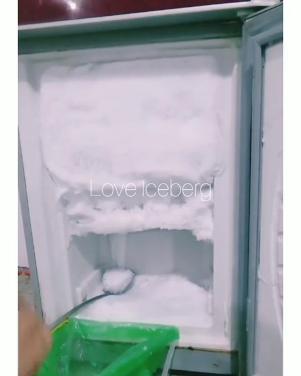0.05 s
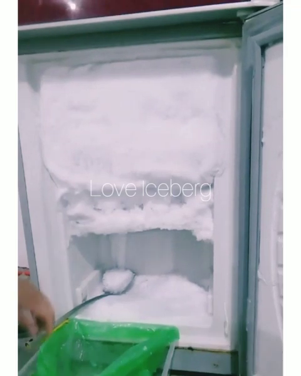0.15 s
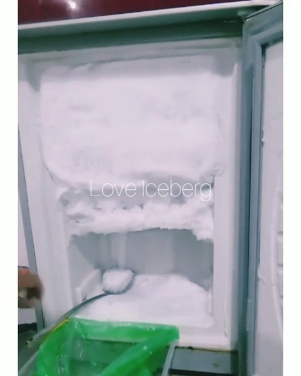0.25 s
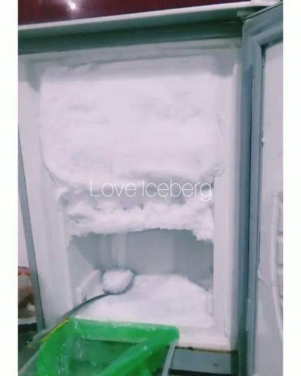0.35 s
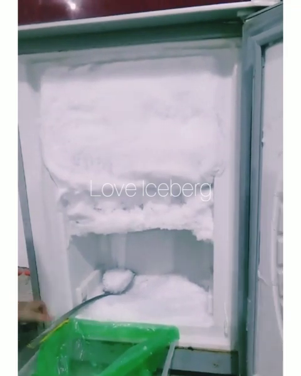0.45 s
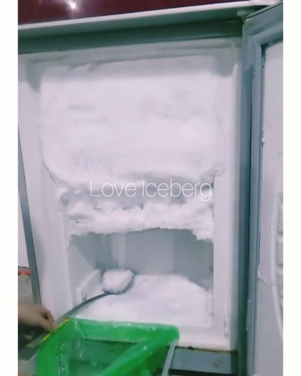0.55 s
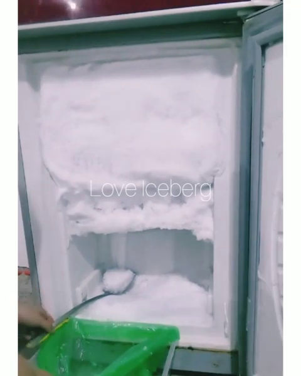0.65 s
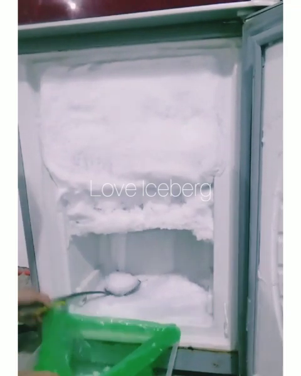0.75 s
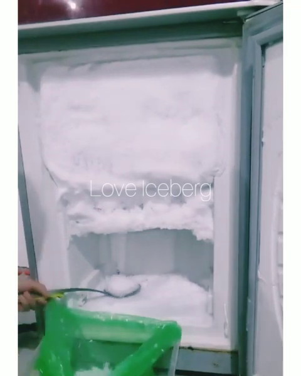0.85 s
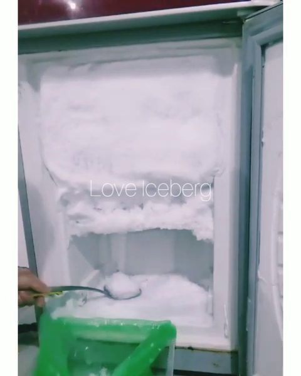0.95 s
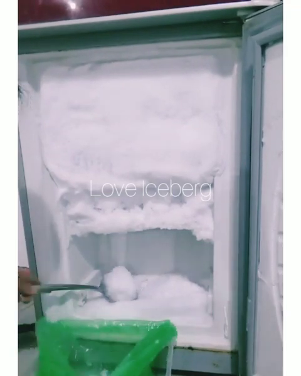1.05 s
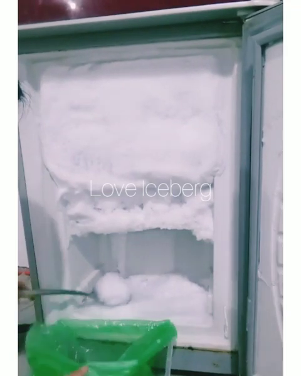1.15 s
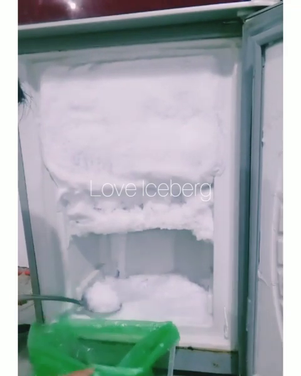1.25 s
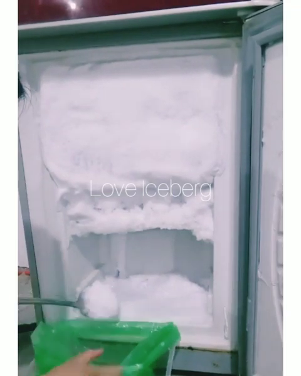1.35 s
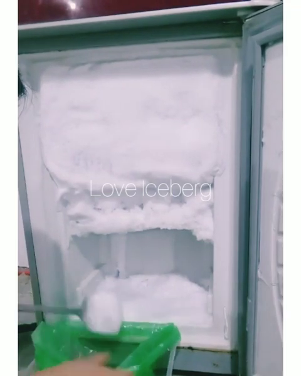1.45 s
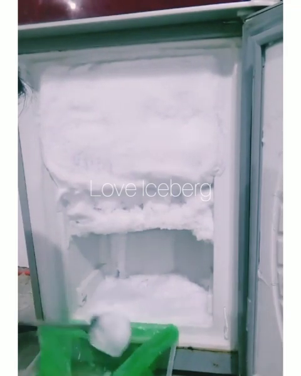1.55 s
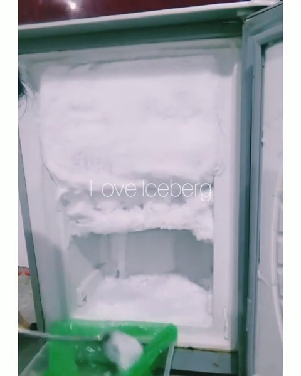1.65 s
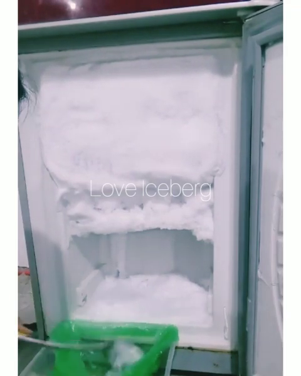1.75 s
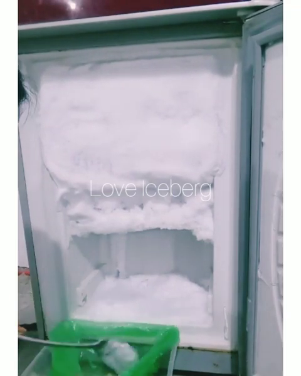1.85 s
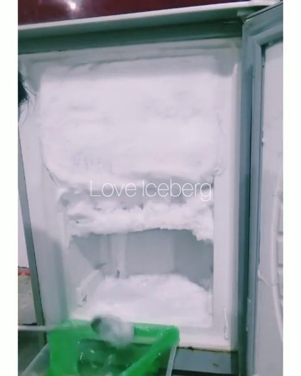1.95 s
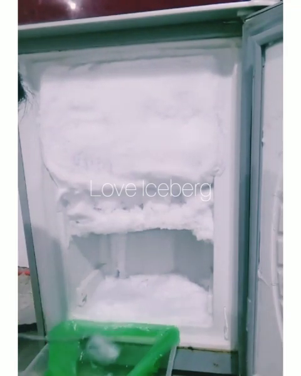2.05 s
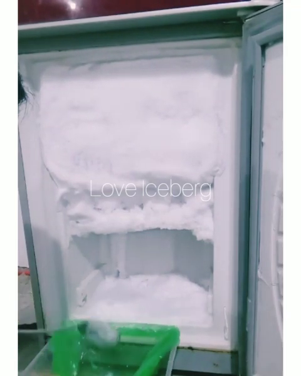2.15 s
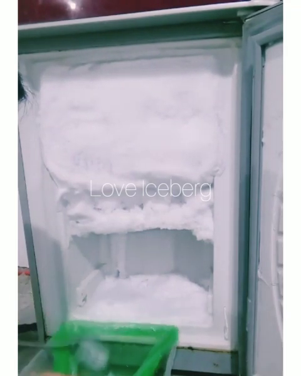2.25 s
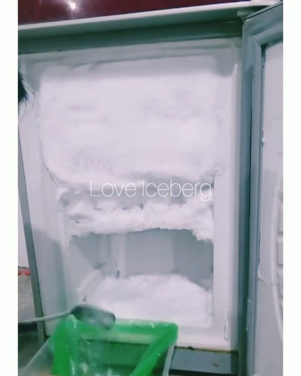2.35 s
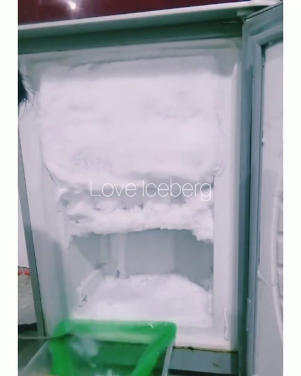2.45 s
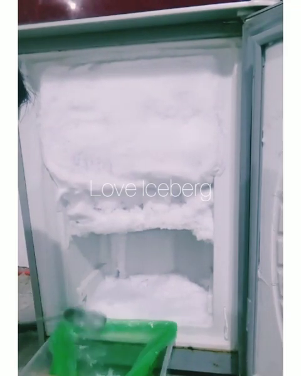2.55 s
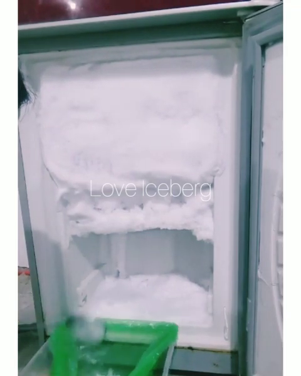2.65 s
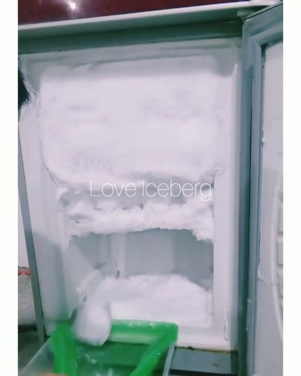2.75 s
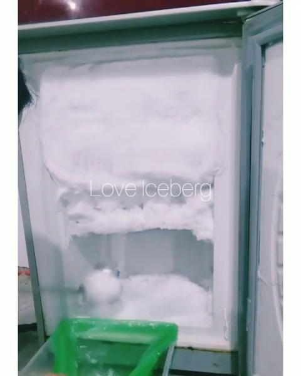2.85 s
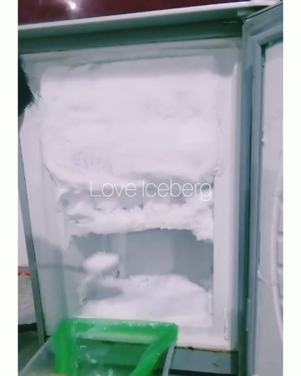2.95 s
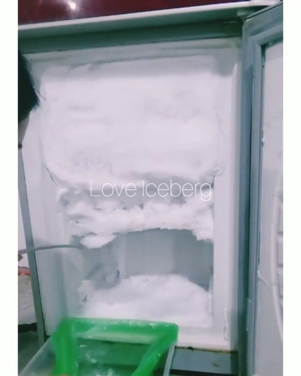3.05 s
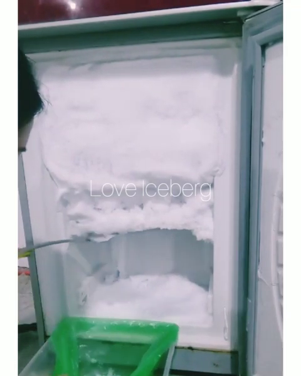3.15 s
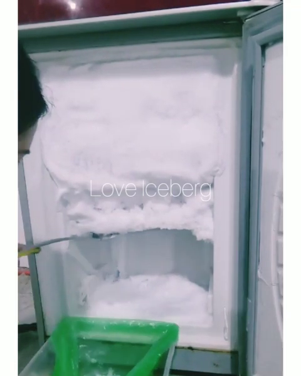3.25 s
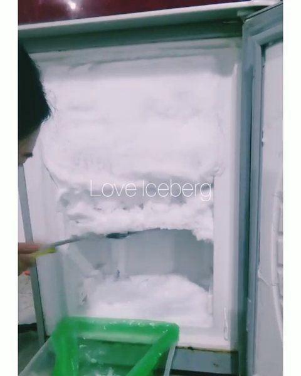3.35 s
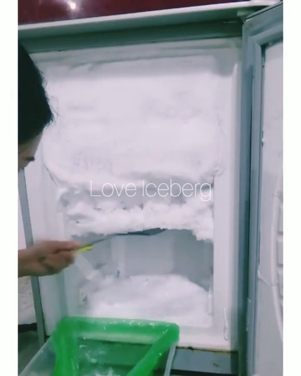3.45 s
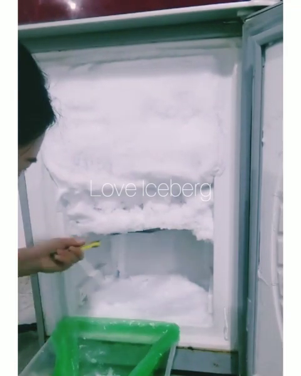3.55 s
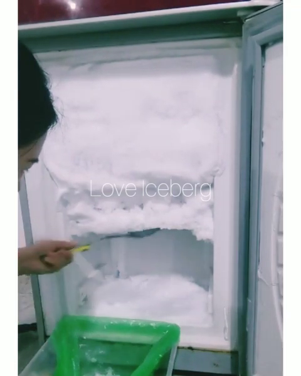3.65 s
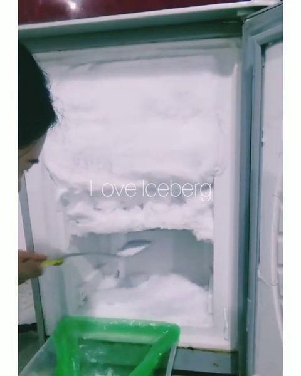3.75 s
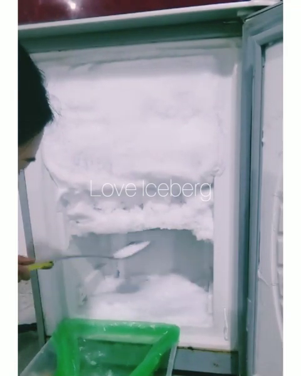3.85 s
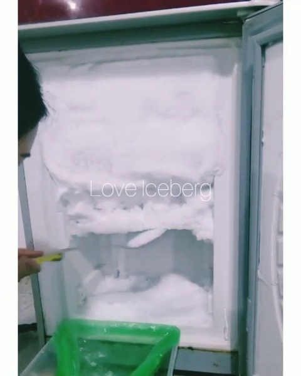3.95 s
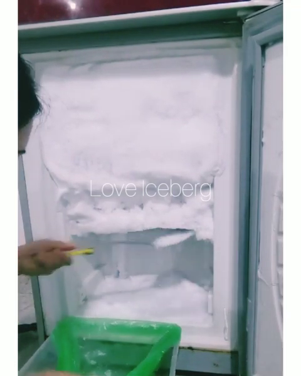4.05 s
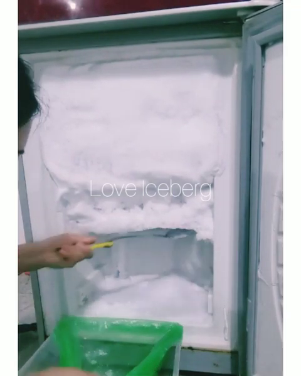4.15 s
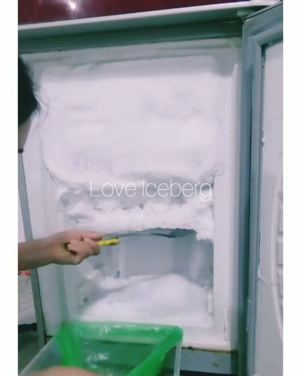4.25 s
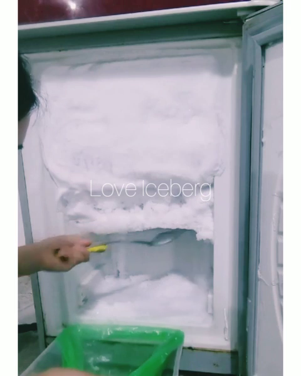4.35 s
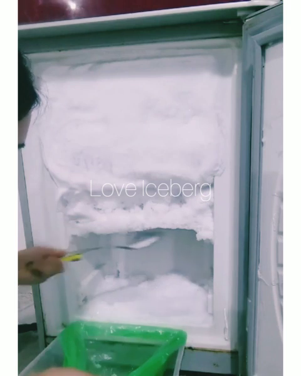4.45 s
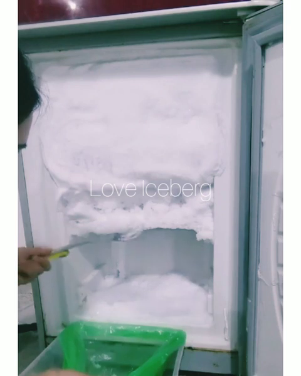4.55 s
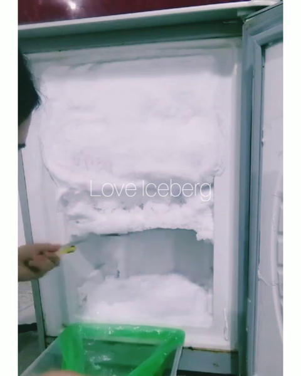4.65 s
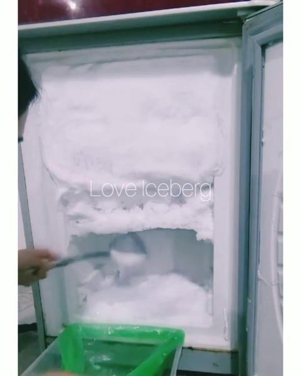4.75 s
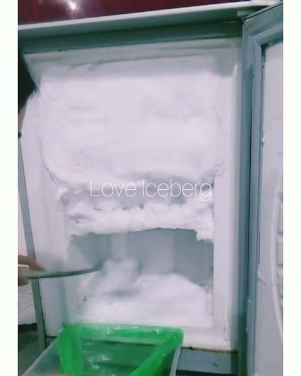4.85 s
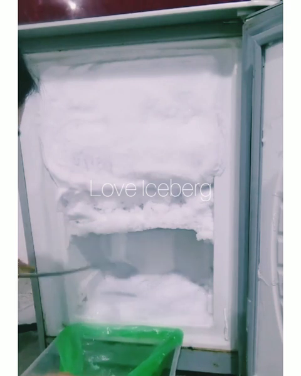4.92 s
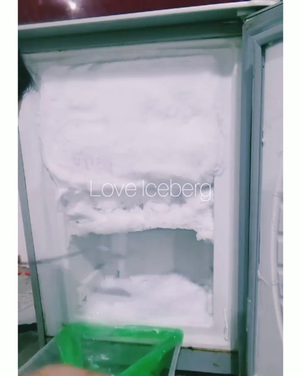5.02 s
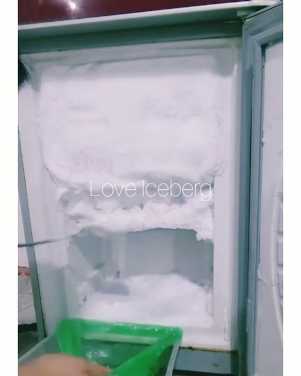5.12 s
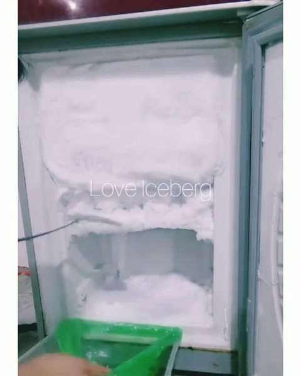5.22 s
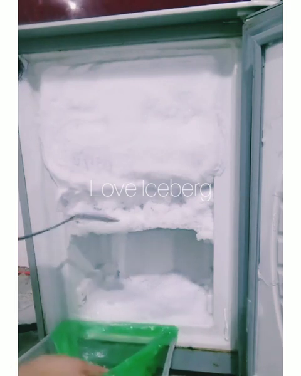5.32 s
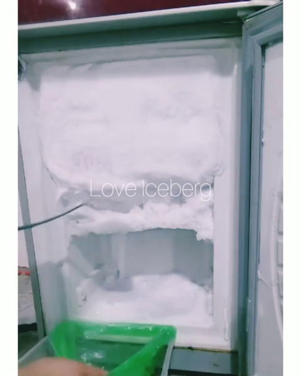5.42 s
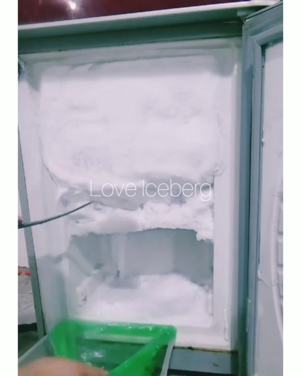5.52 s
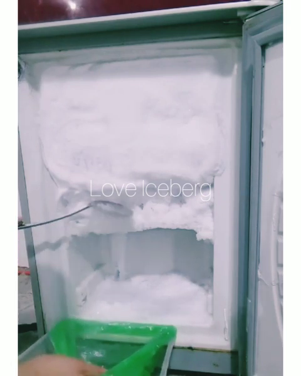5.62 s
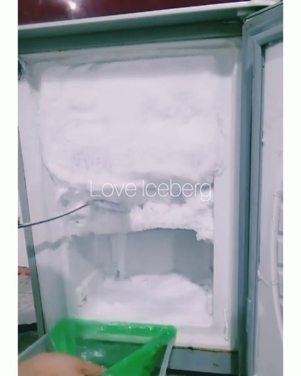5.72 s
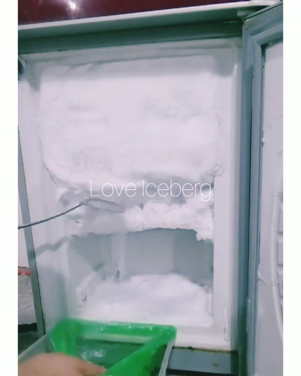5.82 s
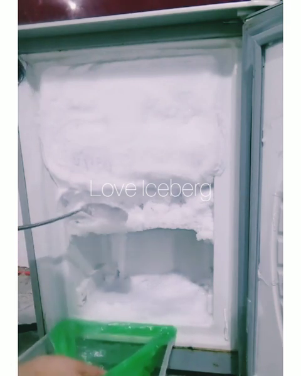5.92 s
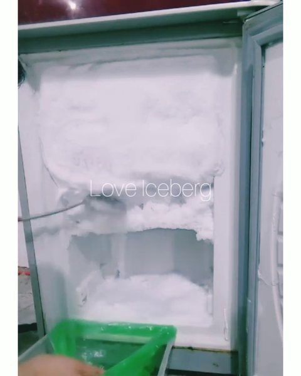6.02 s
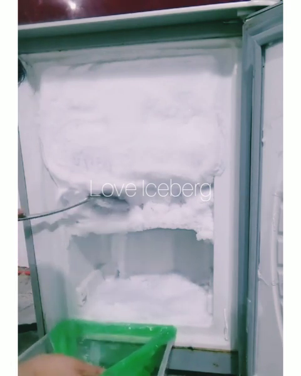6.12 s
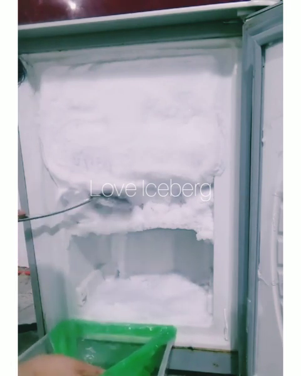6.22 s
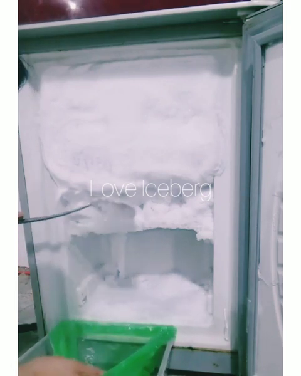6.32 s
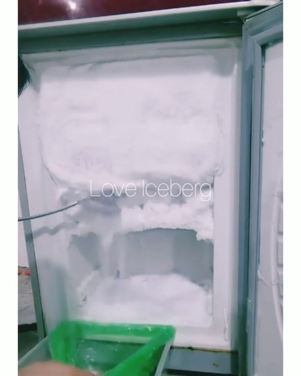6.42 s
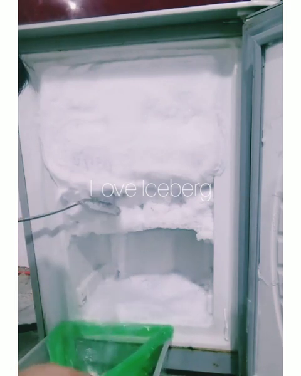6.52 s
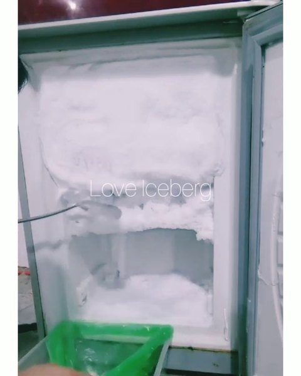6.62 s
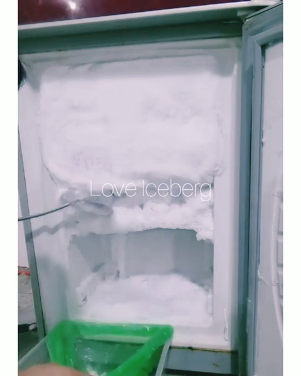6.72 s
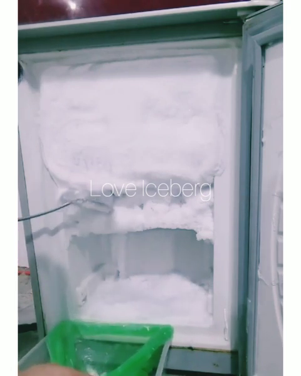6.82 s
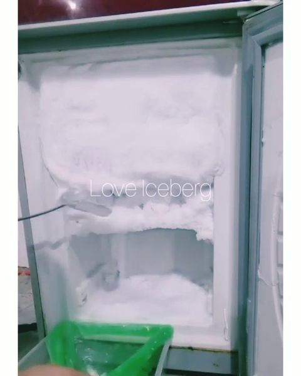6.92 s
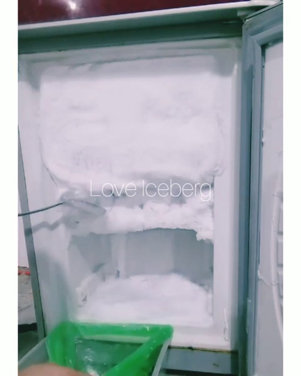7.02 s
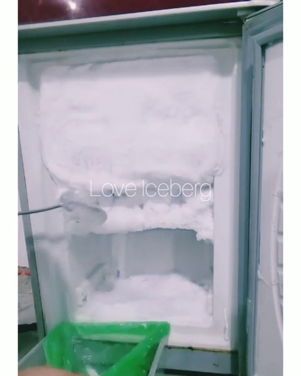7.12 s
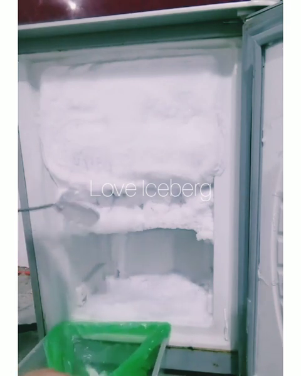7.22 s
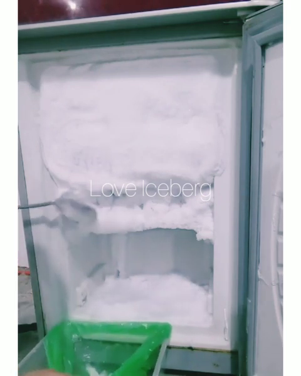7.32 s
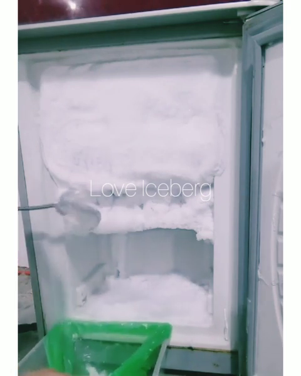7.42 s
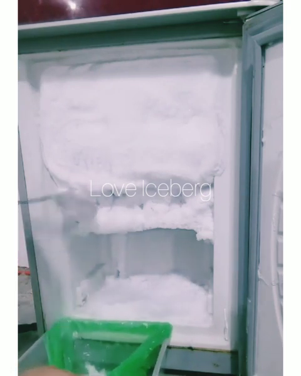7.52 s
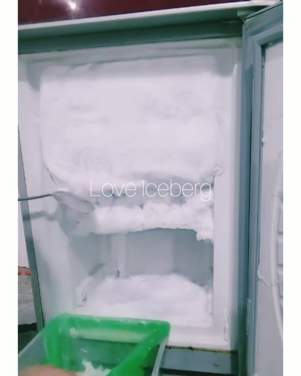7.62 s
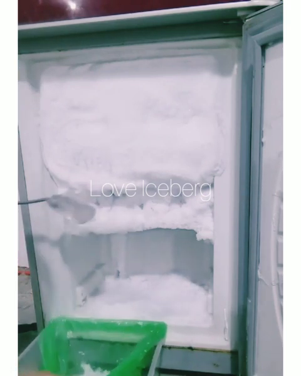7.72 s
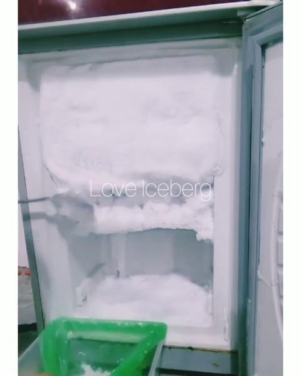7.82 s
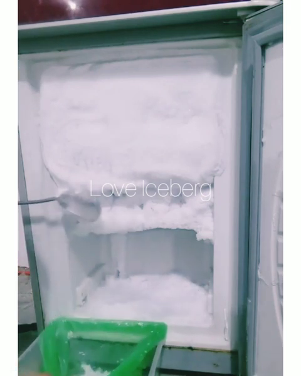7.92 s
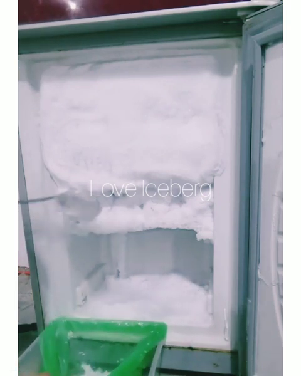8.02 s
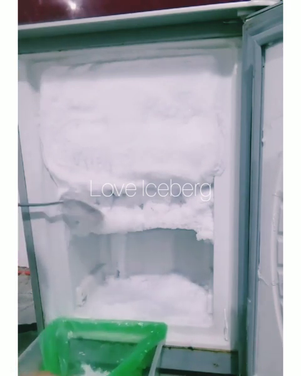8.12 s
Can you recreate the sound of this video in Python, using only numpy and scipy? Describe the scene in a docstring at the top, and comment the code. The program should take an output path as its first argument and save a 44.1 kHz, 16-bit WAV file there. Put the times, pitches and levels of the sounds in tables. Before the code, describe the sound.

In a small kitchen, a metal spoon scoops crunchy frost from a freezer, with soft hissing drags and dull knocks, then rubs against a lined bin. It rakes the compartment roof with hollow, ringing scrapes, pauses briefly, and finally chops the icy shelf in bright, regular jabs running into gritty scrapes. Close mono microphone, short dry room, faint steady hush.

```python
"""In a kitchen freezer a steel spoon works at the frost: scoops loose snow, scrapes it off in a lined bin,
rakes the roof of the compartment, then chops at the icy shelf in jabs that run on as scrapes.
Scrapes are clumped random fractures, filtered into surface thrum, edge rasp and crystal hiss with spoon ring.
Jabs are short noise bursts with ring and a delayed cabinet thud; bumps are cabinet modes under a short push.
A short room tail and a steady noise hush lie beneath; a fast limiter holds the peaks, both channels alike."""
import sys
import numpy as np
from scipy import signal
from scipy.fft import rfft, irfft, next_fast_len
from scipy.io import wavfile
from scipy.ndimage import uniform_filter1d, minimum_filter1d, map_coordinates

SR = 44100
rng = np.random.default_rng(int(sys.argv[2]) if len(sys.argv) > 2 else 0)


def dump(signal):
    """Clip the signal to [-1, 1] and save it as 16-bit WAV at the path in sys.argv[1]."""
    limited = np.clip(np.atleast_2d(signal).T, -1, 1)
    pcm = np.round(limited * 32767).astype(np.int16)
    wavfile.write(sys.argv[1], SR, pcm)


N = 360738  # samples
THRUM_TOP_HZ, RASP_TOP_HZ, TOP_HZ = 800, 3500, 16000


def amp(db):
    """Decibels to gain."""
    return 10 ** (np.asarray(db) / 20)


def unit(x):
    """Scale to rms 1."""
    return x / np.sqrt(np.mean(x ** 2) + 1e-20)


def along(points, hz):
    """Read (Hz, value) points on a log frequency axis."""
    f, v = np.transpose(points)
    return np.interp(np.log(hz + 1), np.log(f + 1), v)


def wobble(size, rate):
    """Smooth random curve, rate knots per second."""
    knots = rng.standard_normal(int(size * rate / SR) + 4)
    return map_coordinates(knots, [np.arange(size) * rate / SR])


def filtered(x, response):
    """Multiply the spectrum of x by response(hz)."""
    m = next_fast_len(len(x) + SR // 4)
    hz = np.fft.rfftfreq(m, 1 / SR)
    return irfft(rfft(x, m) * response(hz), m)[:len(x)]


def shaped_noise(size, gain_db):
    """White noise coloured by gain_db(hz), rms 1."""
    return unit(filtered(rng.standard_normal(size), lambda hz: amp(gain_db(hz))))


def below(hz, edge_hz, order=12):
    """Gain of a steep low-pass."""
    return 1 / np.sqrt(1 + (hz / edge_hz) ** order)


def above(hz, edge_hz):
    """Gain of the power-complementary high-pass."""
    return np.sqrt(1 - below(hz, edge_hz) ** 2)


def resonances(modes, hz):
    """Causal response of damped modes (Hz, width Hz, dB), alternating in sign."""
    total = 0
    for k, (centre, width, db) in enumerate(modes):
        mode = 1j * hz * width / (centre * centre - hz * hz + 1j * hz * width)
        total = total + (-1) ** k * amp(db) * mode
    return total


def add(track, s, sound):
    """Mix a sound into track at s seconds."""
    part = track[max(round(s * SR), 0):][:len(sound)]
    part += sound[:len(part)]


# hush spectrum: f/Hz, relative density/dB
HUSH_SPECTRUM = [(15, -64), (25, -31.5), (105, -4), (206, -3.5), (641, -10.5), (695, -10.5), (936, -15.5),
                 (1070, -9.5), (1160, -13.5), (1790, -15), (5000, -40), (8140, -28.5), (16000, -67)]


def room_tone(level_db):
    """Steady hush of the kitchen: stationary coloured noise."""
    return amp(level_db) * shaped_noise(N, lambda hz: along(HUSH_SPECTRUM, hz))


# room decay: f/Hz, t60/s
ROOM_T60 = [(200, 0.26), (2000, 0.18), (10000, 0.057)]


def kitchen(x):
    """Short room tail: decaying noise, treble dying first, convolved with x."""
    hz, t, z = signal.stft(rng.standard_normal(SR // 2), SR, nperseg=256)
    decay_db = -60 * t / along(ROOM_T60, hz)[:, None]
    tail = signal.istft(z * amp(decay_db), SR, nperseg=256)[1]
    return signal.fftconvolve(x, tail / np.linalg.norm(tail))[:N]


# hollow cabinet modes: f/Hz, width/Hz, relative level/dB
CABINET_MODES = [(88, 9.8, -19), (114, 22, -9.5), (239, 27, -1), (309, 31.5, 4), (450, 110, -14.5),
                 (600, 59, -8)]


def cabinet(hz):
    """Response of the hollow cabinet's low modes."""
    return resonances(CABINET_MODES, hz)


# steel spoon modes: f/Hz, width/Hz, relative level/dB
SPOON_MODES = [(3200, 110, -7), (3860, 60, 1), (5230, 110, -2), (6650, 130, -9), (7200, 300, -5),
               (7680, 200, -4), (10350, 200, -15)]


def spoon_ring(hz):
    """Response of the spoon's ringing modes."""
    return resonances(SPOON_MODES, hz)


def thud(t, push_s):
    """Cabinet modes driven by a short push, peak 1."""
    push = t / push_s * np.exp(-t / push_s)
    boom = filtered(push, cabinet)
    return boom / np.abs(boom).max()


# dull knocks: t/s, relative peak level/dB
KNOCKS = [(0.696, -16), (0.798, -12), (1.682, -9), (3.419, -7.5), (3.588, -12), (4.04, -13), (5.672, -15),
          (5.704, -4.5)]


def bumps(level_db):
    """Back of the spoon knocks the cabinet; a cushion of frost lengthens the push."""
    out, t = np.zeros(N), np.arange(SR // 4) / SR
    for s, db in KNOCKS:
        add(out, s, amp(db + level_db) * thud(t, push_s=0.00085))
    return out


def fractures(size, per_second, scatter_db):
    """Tiny breaks at random moments, random in sign and size, rms 1."""
    happens = rng.random(size) < per_second / SR
    signs = rng.choice([-1, 1], size)
    return unit(happens * signs * amp(scatter_db * rng.standard_normal(size)))


def sliding(x, depth_db, smooth_hz=9000):
    """Travelling contact: narrow resonances come and go, less so in the finest hiss."""
    hz, _, z = signal.stft(x, SR, nperseg=512)
    field = uniform_filter1d(rng.standard_normal(z.shape), size=3, axis=0)  # over frequency
    field = uniform_filter1d(field, size=14, axis=1)  # over time
    depth = depth_db * below(hz, smooth_hz, order=4)[:, None]
    return signal.istft(z * amp(depth * unit(field)), nperseg=512)[1][:len(x)]


# breaking crystals, before tilt: f/Hz, relative density/dB
CRYSTAL_SPECTRUM = [(1470, -34.5), (2500, -25), (3380, -13), (3660, -10.5), (4950, -10.5), (6650, -7),
                    (7950, 1), (9810, -10.5), (13500, -16), (15000, -15), (16000, -15.5)]


def scrape(surface, ring_db, tilt_db, fine_db, uneven_db, size, cabinet_db=-10):
    """Thrum, rasp and crunch of the spoon dragged over one surface, each rms 1."""
    # edge catches and slips: breaks clump
    grip = amp(1.5 * wobble(size, rate=60) + 1.25 * wobble(size, rate=330))
    slips = grip * fractures(size, per_second=4000, scatter_db=3.5)
    breaks = sliding(grip * fractures(size, per_second=7500, scatter_db=1.5), uneven_db)

    def thrum_gain(hz):
        hollow = 1 + amp(cabinet_db) * np.abs(cabinet(hz))
        return amp(along(surface, hz)) * hollow * below(hz, THRUM_TOP_HZ)

    def rasp_gain(hz):
        return amp(along(surface, hz)) * above(hz, THRUM_TOP_HZ) * below(hz, RASP_TOP_HZ)

    def hiss_gain(hz):
        tilt = tilt_db * np.log2((hz + 1) / RASP_TOP_HZ)
        finest = fine_db * above(hz, 9100) ** 2
        return amp(along(CRYSTAL_SPECTRUM, hz) + tilt + finest) * above(hz, RASP_TOP_HZ)

    thrum = filtered(slips, thrum_gain)
    rasp = filtered(breaks, rasp_gain)
    hiss = filtered(breaks, hiss_gain)
    ring = filtered(breaks, spoon_ring)
    # changing pressure bends the modes
    ring = map_coordinates(ring, [np.cumsum(1 + 0.00491 * wobble(size, rate=14))])
    crunch = unit(hiss) + amp(ring_db) * unit(ring)
    return np.array([unit(thrum), unit(rasp), unit(crunch)])


RISE_DB = 15.5  # gained per rise time as the edge digs in
THRUM_RELEASE_DB_PER_S, RASP_RELEASE_DB_PER_S, CRUNCH_RELEASE_DB_PER_S = 63, 72.5, 94.5  # crumbs settle
LIFT_DB, LIFT_S = 4, 0.084  # extra drop as the edge lifts off
# pushes through the frost: t/s of full bite, rise before it/s, push/s,
#   relative thrum, rasp, crunch level/dB, change over push: thrum and rasp/dB, crunch/dB
PUSHES = [(0.027, 0.0073, 0.16, -30, -21, -27.5, -11.5, -15.5),
          (0.694, 0.032, 0.058, -37.5, -46, -37, 4, 6), (0.776, 0.014, 0.064, -20, -19.5, -19.5, 3, 6),
          (0.917, 0.025, 0.097, -27.5, -27.5, -25.5, -1.5, 1.5),
          (1.23, 0.094, 0.32, -45.5, -48.5, -39, -5, -16.5),
          (1.65, 0.032, 0.085, -42.5, -32, -21, 4.5, 2.5),
          (1.755, 0.012, 0.15, -21, -15.5, -13.5, -15.5, -10),
          (2.253, 0.098, 0.077, -43, -35.5, -23.5, -6, -7.5),
          (2.344, 0.0082, 0.12, -19.5, -19, -30.5, 5.5, 4.5),
          (2.536, 0.013, 0.14, -19, -19.5, -26.5, 7, -3), (2.766, 0.017, 0.11, -14, -17.5, -24, 1, -14),
          (3.119, 0.014, 0.062, -23, -30, -30, 0, -22), (3.22, 0.083, 0.15, -32, -31.5, -25.5, 3.5, 6.5),
          (3.401, 0.054, 0.21, -13, -28, -23.5, 2.5, 1), (3.845, 0.2, 0.12, -30.5, -42.5, -59, -2, -3),
          (4.033, 0.0042, 0.077, -9.5, -24, -23.5, -7.5, -4),
          (4.142, 0.059, 0.16, -15.5, -20, -20, -1, 0.5),
          (4.617, 0.012, 0.026, -29, -34.5, -26, -2.5, -2.5),
          (4.746, 0.034, 0.25, -37, -48.5, -51.5, -11, -7),
          (5.029, 0.022, 0.018, -39.5, -30.5, -26.5, -2, 1),
          (5.135, 0.043, 0.034, -44, -37.5, -26, -1, -1.5),
          (5.67, 0.012, 0.14, -12.5, -20.5, -25, -8, -12.5), (5.856, 0.035, 0.1, -26, -30, -25, 0, -3.5),
          (6.109, 0.0066, 0.12, -16, -21, -27, 1, 8.5), (6.515, 0.032, 0.017, -18, -22.5, -18, -1.5, -5),
          (6.642, 0.07, 0.1, -27.5, -25.5, -17, -1.5, -3.5),
          (6.809, 0.013, 0.028, -22, -27, -19.5, 2.5, -4.5),
          (7.078, 0.031, 0.18, -19.5, -24, -19.5, -13, -16.5),
          (7.346, 0.015, 0.19, -13.5, -16, -26.5, -1, -4.5), (7.621, 0.025, 0.14, -15, -21.5, -27, -1, -6),
          (7.894, 0.011, 0.1, -21, -20.5, -22.5, 2, -1.5), (8.149, 0.012, 0.031, -21, -22, -20.5, 3.5, 1.5)]


def drag():
    """Gains of thrum, rasp, crunch: each push digs in, swells or eases, then dies away."""
    power = np.zeros((3, N))
    release = np.array([[THRUM_RELEASE_DB_PER_S], [RASP_RELEASE_DB_PER_S], [CRUNCH_RELEASE_DB_PER_S]])
    for s, rise, push, thrum_db, rasp_db, crunch_db, press_db, crumble_db in PUSHES:
        near = slice(max(round(s * SR) - SR // 2, 0), round(s * SR) + SR)
        t = np.arange(N)[near] / SR - s
        done = np.clip(t / push, 0, 1)
        held_db = np.array([thrum_db + press_db * done, rasp_db + press_db * done,
                            crunch_db + crumble_db * done])
        dig_db = RISE_DB * np.minimum(t, 0) / rise
        after = np.maximum(t - push, 0)
        fall_db = LIFT_DB * np.minimum(after / LIFT_S, 1) ** 2 + release * after
        power[:, near] += amp(held_db + dig_db - fall_db) ** 2
    return np.sqrt(power)


# surface answers to the spoon: f/Hz, relative density/dB
SHELF_FLOOR = [(41, -42), (70, -15), (184, -28), (262, -14.5), (362, -14), (482, 3.5), (621, -1),
               (1140, -6), (1930, -2.5), (4000, -12), (5200, -49), (8800, -120)]
PACKED_SNOW = [(35, -53), (60, -23), (245, -0.5), (354, -9.5), (437, -2.5), (503, -8.5), (852, -10),
               (1090, -7.5), (1370, -6.5), (1470, -5), (1660, -8), (2450, -12.5), (4000, -16.5),
               (5200, -33), (8800, -120)]
LOOSE_SNOW = [(35, -35.5), (60, -12.5), (503, -7.5), (549, -1.5), (600, -6.5), (715, -12), (780, -4.5),
              (4000, -2), (5200, -22), (8800, -120)]
BIN = [(35, -38), (60, -18), (91, -5.5), (172, -2.5), (216, -9.5), (367, -0.5), (407, 4), (512, 1.5),
       (579, -5.5), (702, -11.5), (808, -5), (1280, -15.5), (1500, -14), (1950, -16.5), (4000, -32.5),
       (5200, -33), (8800, -120)]
ROOF_FRONT = [(35, -60), (60, -20), (139, -18.5), (202, 1), (232, 2), (319, -0.5), (360, -8), (503, -4),
              (621, -5.5), (808, -15), (1030, -15), (2280, -29.5), (3180, -24), (3480, -31), (4000, -15.5),
              (5200, -67), (8800, -120)]
ROOF_BACK = [(35, -43), (60, -39), (81, -6), (144, -16.5), (188, 2), (240, 1.5), (373, 1.5), (569, -3),
             (767, -5), (837, -7), (2280, -16), (2580, -15), (3480, -23.5), (4000, -31), (5200, -63),
             (8800, -120)]
FRINGE = [(35, -40), (100, -6), (300, -10), (600, -12), (1100, -15), (1550, -6), (2200, -2.5), (2800, -7.5),
          (4000, -6), (5200, -32)]
SHELF_TOP = [(35, -57), (60, -29), (113, -18), (155, -16), (245, 3), (393, -7.5), (610, -2.5), (767, -27),
             (837, -13), (1070, -34), (1300, -15.5), (1660, -36), (1880, -27), (2490, -40), (4000, -44),
             (5200, -58), (8800, -120)]
SHELF_FACE = [(35, -46), (60, -21), (102, -5), (150, -10), (282, 0), (422, -6), (461, 0), (740, -8),
              (1210, -12), (1300, -9), (1520, -14.5), (1880, -17.5), (3300, -20), (4000, -26), (5200, -52),
              (8800, -120)]
SHELF_LIP = [(35, -47), (60, -15), (105, -2), (144, -4), (282, 2), (386, -5), (453, 0), (494, -4),
             (600, -0.5), (715, -8.5), (1070, -1), (1190, -7), (1300, -5), (1910, -4.5), (4000, -15),
             (5200, -42), (8800, -120)]
HARD_ICE = [(35, -47), (60, -26.5), (115, -7), (200, -8.5), (270, 1), (380, -10.5), (560, -15),
            (690, -19.5), (900, -8.5), (1150, -4.5), (1380, -10.5), (1850, -24.5), (2450, -12), (2900, -31),
            (3250, -16), (3700, -44), (5200, -55)]
ICE_CORNER = [(35, -47), (60, -13), (109, -4.5), (209, -7.5), (245, 4.5), (277, -5.5), (313, -5),
              (429, -19), (678, -8), (981, -16.5), (1050, -12.5), (1750, -7), (2050, -18.5), (2400, -11.5),
              (4000, -23), (5200, -57), (8800, -120)]
# where the spoon works: start t/s, surface, ring re hiss/dB, crunch tilt/(dB/octave),
#   finest crystals/dB, unevenness of colour/dB
PLACES = [(0, SHELF_FLOOR, -17.5, -7.5, -13, 3), (0.6, PACKED_SNOW, -25, -1, -0.5, 2),
          (1.5, LOOSE_SNOW, -34.5, 2.5, -3.5, -0.5), (2.33, BIN, -26, -6, 1, 1),
          (3.1, ROOF_FRONT, -1.5, 2.5, -1.5, 5), (4.032, ROOF_BACK, -1, -7, 5.5, 1.5),
          (4.606, ROOF_BACK, -4.5, 3.5, -10.5, 6), (5.0, FRINGE, -32, 1, -2.5, 2),
          (5.6, SHELF_TOP, -5, -11, 3, 4.5), (5.85, SHELF_FACE, -19, -2.5, 1, -0.5),
          (6.45, SHELF_LIP, -6.5, -3.5, -0.5, 2.5), (7.32, HARD_ICE, -16.5, -4, -0.5, 2),
          (7.88, ICE_CORNER, -12, 1, -6, -0.5)]


def scraping(thrum_db, rasp_db, crunch_db):
    """Pushes of the spoon drag across one surface after another."""
    edges = [0] + [round(place[0] * SR) for place in PLACES[1:]] + [N]
    parts = [scrape(*place[1:], size=b - a) for place, a, b in zip(PLACES, edges, edges[1:])]
    return amp([thrum_db, rasp_db, crunch_db]) @ (drag() * np.hstack(parts))


def colour(depth_db, count):
    """Random peaks and dips (Hz, dB): no two chips of ice sound alike."""
    return [(hz, depth_db * rng.standard_normal()) for hz in np.geomspace(THRUM_TOP_HZ, TOP_HZ, count)]


# burst spectra: f/Hz, relative density/dB
CRACK_SPECTRUM = [(1200, -35), (2600, 0.5), (4000, -0.5), (6300, -2), (8200, 8.5), (9800, -9.5),
                  (11500, -22)]
FIZZ_SPECTRUM = [(7500, -13.5), (10000, 5.5), (15500, -11.5)]
CLACK_SPECTRUM = [(250, -18.5), (700, -5), (1600, -3), (2500, -8.5), (4500, -29.5)]
# edge bites, ice gives way: t/s, relative jab level/dB, then trims of fizz, clack, thud/dB, burst length/s
BITES = [(0.0257, -11.5, -37, 1.5, -28, 0.0024), (0.7716, -29, -18, 12, -9, 0.0054),
         (1.0275, 0.5, -29.5, -30, -21, 0.0041), (1.049, -19.5, -26, 4.5, 0, 0.01),
         (2.3453, -5.5, -28, 6, -8, 0.0037), (2.5505, -3, -26, -0.5, -10.5, 0.0041),
         (2.765, -11.5, -29, 9, -6, 0.0054), (3.1105, -7.5, -22, -12, -5, 0.0066),
         (3.3756, -1, -27, -37, -8.5, 0.011), (3.4989, -7, -23, -16.5, -2, 0.0047),
         (4.0348, -16, -20, 0.5, 8, 0.0024), (4.1614, -2, -17, -15, -5, 0.0094),
         (4.425, -20.5, -23.5, 2, -12, 0.0059), (4.6168, -16.5, -28, -24.5, -7, 0.0053),
         (5.664, 1.5, -20, -9, -5, 0.0069), (5.8538, 4, -23.5, -8, -18, 0.0045),
         (6.107, -4.5, -31, -2.5, -3, 0.0045), (6.1144, -2.5, -14, -10.5, -10, 0.0069),
         (6.5034, 3, -14.5, -13.5, -29, 0.0092), (6.6, -8.5, -17, -6.5, -10, 0.005),
         (6.6883, -3.5, -18, -3.5, -28, 0.0067), (6.808, 2.5, -17.5, -18, -24, 0.0074),
         (7.0597, -10.5, -15.5, -7.5, -27, 0.0055), (7.0678, 4.5, -13, -18, -24, 0.01),
         (7.3411, -1.5, -18, -10, -10, 0.0087), (7.624, 5.5, -9, -9, -16, 0.0044),
         (7.8925, 1.5, -11.5, -20, -30, 0.0067), (8.079, -10.5, -30, 8.5, -13, 0.0053),
         (8.144, -1, -7.5, -15.5, -17, 0.0099)]


def jabs(crack_db, fizz_db, clack_db, thud_db, ring_db, colour_db, thud_lag_s):
    """Each jab bursts into crack, fizz and clack; the spoon rings, a cabinet thud follows."""
    out, t = np.zeros(N), np.arange(SR // 4) / SR
    for s, db, fizz_rel, clack_rel, thud_rel, length in BITES:
        attack = 1 - np.exp(-t / 0.00076)
        crumbs = 0.13 * np.exp(-t / 0.018)
        burst = attack * (np.exp(-(t / length) ** 2) + crumbs)
        chip = colour(colour_db, count=32)

        def noise(spectrum):
            return shaped_noise(len(t), lambda hz: along(spectrum, hz) + along(chip, hz))

        crack = amp(crack_db) * burst * noise(CRACK_SPECTRUM)
        fizz = amp(fizz_db + fizz_rel) * burst * noise(FIZZ_SPECTRUM)
        clack = amp(clack_db + clack_rel) * burst * noise(CLACK_SPECTRUM)
        ring = amp(ring_db) * filtered(crack, spoon_ring)
        add(out, s, amp(db) * (crack + fizz + clack + ring))
        add(out, s + thud_lag_s, amp(db + thud_db + thud_rel) * thud(t, push_s=0.00046))
    return out


def scene():
    """Hush, room tail and spoon, alike in both channels."""
    hush = room_tone(level_db=-47.5)
    spoon = bumps(level_db=-5.0) + scraping(thrum_db=-1.0, rasp_db=-1, crunch_db=-0.5)
    spoon = spoon + jabs(crack_db=-9, fizz_db=-2.5, clack_db=-2, thud_db=-1, ring_db=-2.5,
                         colour_db=5.5, thud_lag_s=0.00486)
    mono = spoon + amp(-13) * kitchen(spoon) + hush
    return np.array([mono, mono])


def record(dry, ceiling=1.0):
    """Mono microphone: 45 Hz high-pass, fast peak limiter, then a cut at the band limit."""
    heard = filtered(dry.mean(axis=0), lambda hz: 1j * hz / (1j * hz + 45))
    needed = np.minimum(1, ceiling / (np.abs(heard) + 1e-9))
    gain = uniform_filter1d(minimum_filter1d(needed, size=15), size=15)
    return np.tile(filtered(heard * gain, lambda hz: hz < TOP_HZ), (2, 1))


dry = scene()
out = record(dry)
dump(out)
```